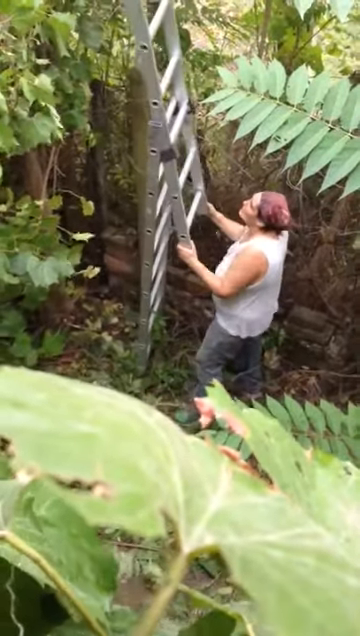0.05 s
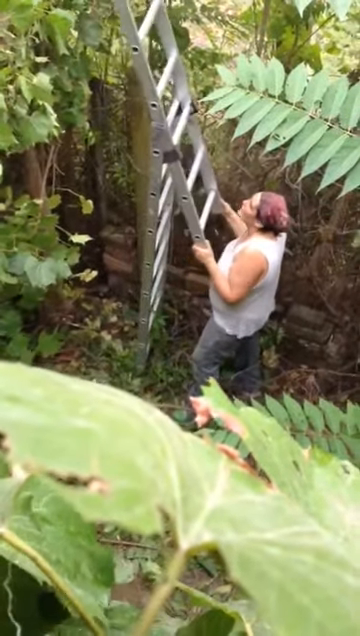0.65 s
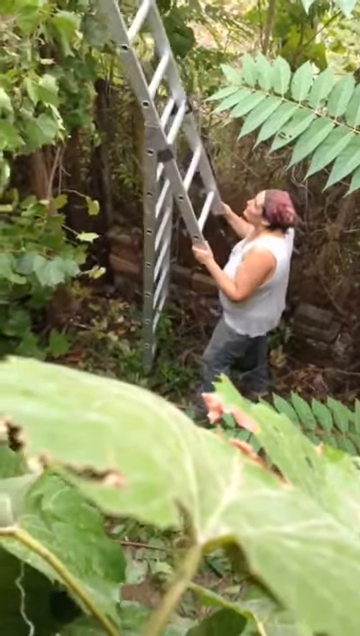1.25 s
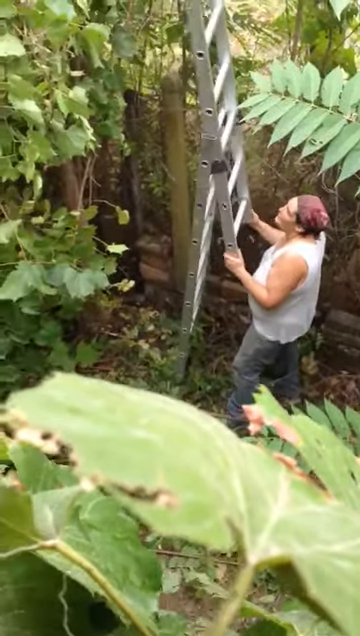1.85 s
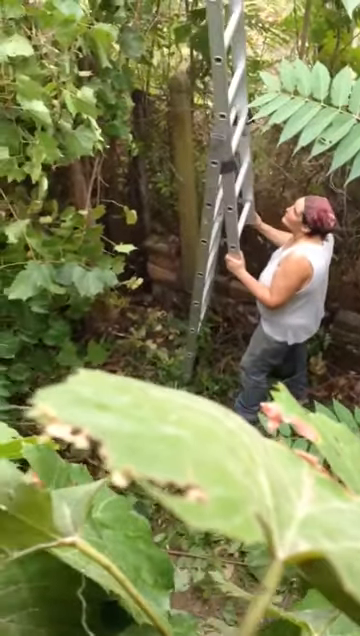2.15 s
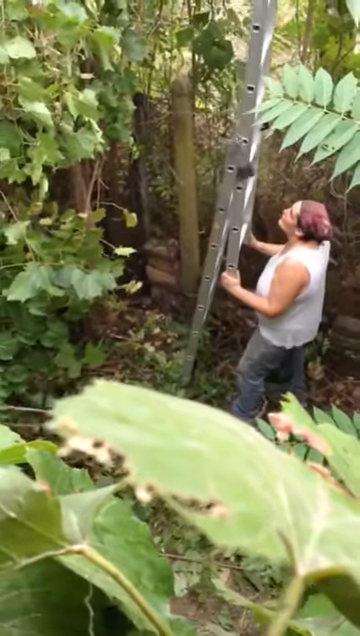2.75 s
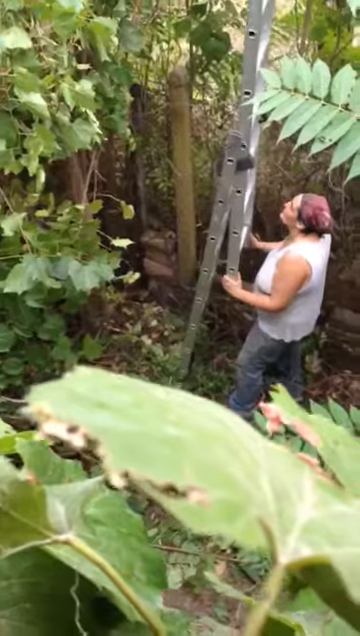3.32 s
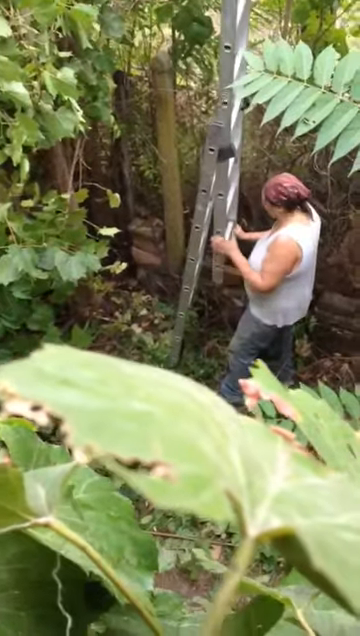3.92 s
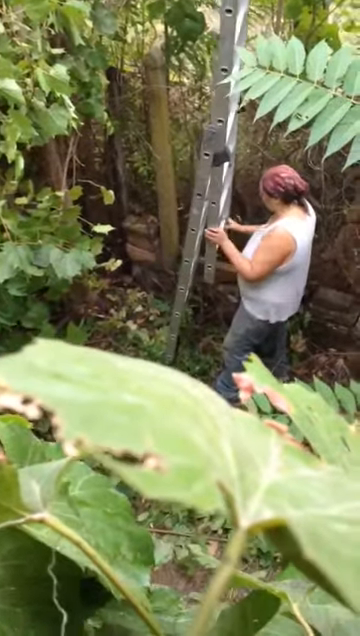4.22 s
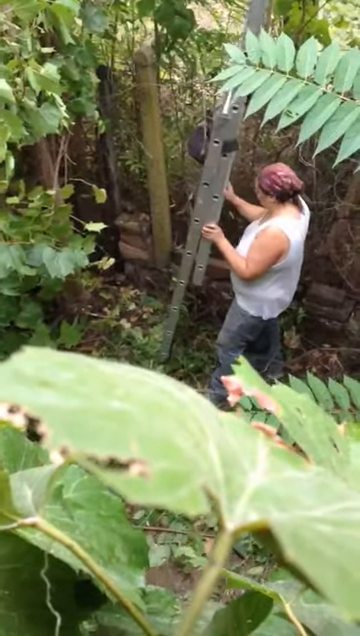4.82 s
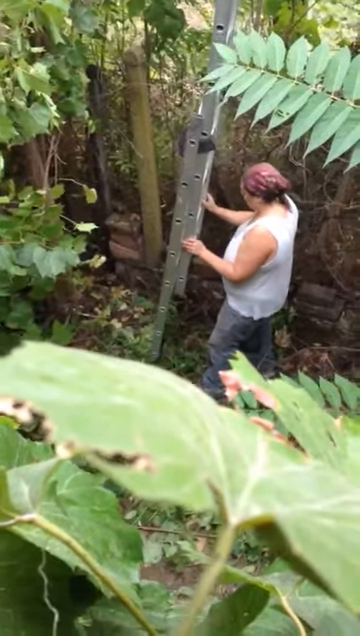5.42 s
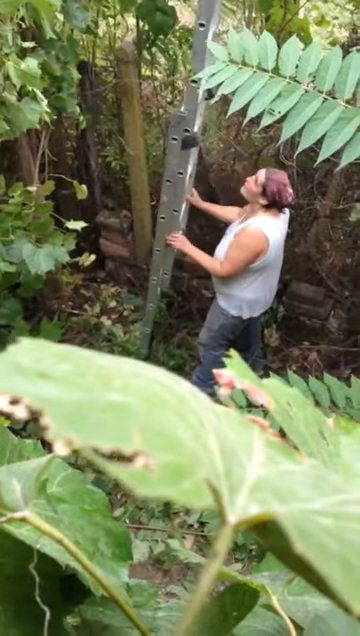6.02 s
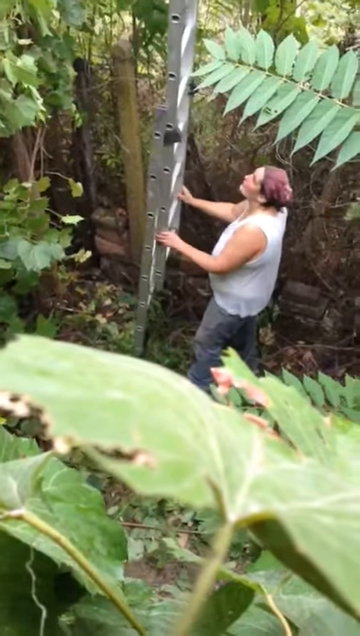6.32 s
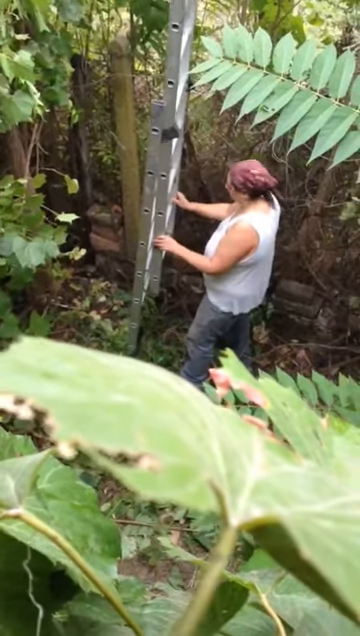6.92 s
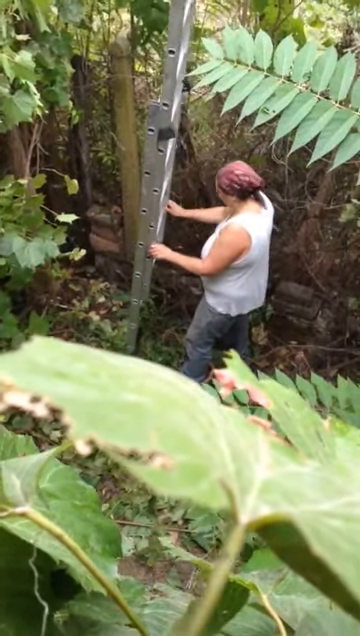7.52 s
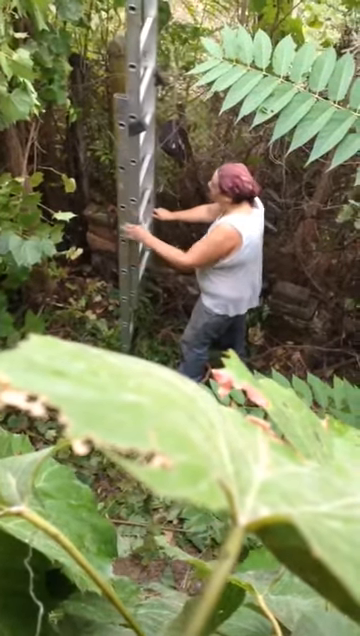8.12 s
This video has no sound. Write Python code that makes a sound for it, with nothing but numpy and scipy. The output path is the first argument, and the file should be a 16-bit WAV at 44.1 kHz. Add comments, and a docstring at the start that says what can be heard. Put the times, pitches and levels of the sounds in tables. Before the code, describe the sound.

Outdoors, over a faint steady hum, a metal ladder knocks and rattles unevenly as it is moved, heard from a few metres off. Bursts of clanking and brief scraping alternate with quieter gaps and soft foliage rustle. A twig cracks partway through, the knocks grow busier, and a tiny squeak leads into a final sharp, bright clatter.

```python
"""An aluminium extension ladder is shifted upright and its sections slid together, a few metres off.
Each knock or stick-slip slide is a flurry of tiny contacts that excites the damped modes of the hollow
rails and rungs; harder contacts ring brighter. Foliage brushes the rails, the rung locks ping, a twig
snaps and a rail squeaks. A garden fence and bushes scatter the sound, over a low outdoor hum."""
import sys
import numpy as np
from scipy import signal
from scipy.fft import rfft, irfft, next_fast_len
from scipy.io import wavfile
from scipy.ndimage import uniform_filter1d

SR = 44100
rng = np.random.default_rng(int(sys.argv[2]) if len(sys.argv) > 2 else 0)


def write(x):
    x = np.atleast_2d(x).T
    wavfile.write(sys.argv[1], SR, np.round(np.clip(x, -1, 1) * 32767).astype(np.int16))


N = 359856
RING_SAMPLES = int(.75 * SR)
CUTOFF_HZ = 11000
ENERGY_WINDOW_S = .03   # a contact's level is its energy expressed as an rms over this time

# sections knocking together: start_s, contact_s, level_db, hardness_db (treble), weight_db (bass)
KNOCKS = [(0.0, 0.00088, -44.5, 3, -5), (0.19, 0.0064, -51.5, -16, 0), (0.565, 0.01, -54, -2.5, 3),
          (0.731, 0.0018, -41, -6, -2.5), (0.856, 0.0025, -53.5, -8, 3), (0.96, 0.017, -47, -6, -10),
          (0.986, .004, -47.5, 0, 0.5), (1.046, 0.00088, -49.5, -3.5, -3), (1.601, 0.0019, -48, 1.5, 1),
          (1.782, 0.004, -35.5, -1.5, 4), (1.955, .003, -34, 8.5, -3), (1.978, 0.0088, -30, 4.5, 1),
          (2.041, 0.0036, -34, 5.5, 0.5), (2.434, .002, -35, 1.5, 0.5), (2.596, 0.0019, -48.5, 12, -6),
          (3.045, 0.009, -55, -6, -5), (3.345, .004, -60.5, -8, -5), (3.51, 0.0061, -35, -2, -2),
          (3.655, 0.0061, -45, 8, 1.5), (3.67, 0.00058, -41.5, 3, 1.5), (3.836, 0.0077, -45, -7, 0.5),
          (3.918, 0.0027, -35, 3.5, -3), (4.51, 0.0051, -43.5, -6.5, 7), (4.571, 0.0048, -51.5, 7, -3),
          (4.618, 0.0054, -35, -6, 0.5), (4.675, 0.009, -36, 2.5, 3.5), (4.702, 0.0021, -29.5, 1, 7),
          (4.779, 0.0065, -38.5, -11, -13), (4.842, 0.0017, -37, -11, -3.5), (4.881, 0.0036, -43, 0.5, 3.5),
          (5.112, 0.0035, -40, -2, 0.5), (5.38, 0.011, -43.5, -5, 0), (5.403, 0.021, -29, 5.5, -1),
          (5.414, 0.0022, -28.5, 13, 2), (5.428, 0.0029, -30, 11, -6), (5.561, 0.004, -32.5, 1, 1.5),
          (6.016, .001, -55.5, -5, -8), (6.139, 0.0037, -51.5, -10.5, 5), (6.194, 0.0059, -37, 6, 2),
          (6.298, 0.0035, -41, -3.5, 3), (6.467, 0.01, -40.5, 0.5, 3), (6.729, 0.0031, -35.5, 7, 2.5),
          (6.757, 0.0022, -32, 4, 0), (7.203, 0.006, -43, -2, 7.5), (7.323, 0.0038, -31, 7, -0.5),
          (7.505, .016, -33, -7.5, 3.5), (7.543, 0.0068, -39, 5, 0), (7.641, 0.0077, -42.5, -6.5, 4),
          (7.849, .012, -24, 12, 4.5), (7.861, 0.0037, -23, 11.5, 4.5), (7.91, 0.01, -26, 4, -2)]
# how strongly the ladder radiates: frequency_hz, density_db
RADIATION = [(90, -32), (140, -32), (220, -12.5), (380, -12.5), (560, -8.5), (780, -14), (1000, -4.5),
             (1180, -3), (1500, -11.5), (2100, -12.5), (4000, -12), (7000, -14), (10000, -16.5),
             (11000, -35)]
# resonances of rails and rungs: centre_hz, width_hz, lift_db
RESONANCES = [(266, 32, 3), (499.5, 33, 7.5), (619, 40, 9.5), (702.6, 29, 15.5), (905, 20, 5),
              (1056, 24, 3), (1096, 44, 4.5), (1180, 60, 2.5), (1353, 20, -2), (1475, 37, 9.5),
              (1607, 43, 3.5), (1910, 108, 5.5), (2220, 31, -1), (2380, 45, 5.5), (2996, 130, 4),
              (3300, 36, 5), (3530, 35, 5), (3910, 140, 4.5), (4250, 120, 7), (4620, 92, 4.5),
              (5400, 70, -9), (6000, 41, -5), (7450, 50, 6), (9700, 70, -3)]
# decay of the ladder held in two hands: frequency_hz, t60_s
HELD_DECAY = [(200, 0.33), (600, 0.19), (1150, 0.26), (2000, 0.28), (4000, 0.21), (10000, 0.21)]
# bending modes that ring on: pitch_hz, level_db, t60_s
BENDING_MODES = [(690, -24, .55), (1045, -17, .55), (1101, -13, 0.81), (1180, -17, .55),
                 (1242, -12.5, 0.46), (1437, -10, 0.47)]
# bounds of the five registers of a contact: edge_hz
REGISTER_EDGES_HZ = [150, 400, 800, 1800, 4500, 10500]
# colour of a contact in each register, low to high: offset_db, hardness_share, weight_share
CONTACT_COLOUR = [(-19.5, 0.0071, 0.43), (-10, 0, 1), (0.83, 0.073, 0), (-6.5, 0.65, 0), (-12, 1, 0.07)]
# foliage against the rails: time_s, level_db
FOLIAGE_LEVELS = [(0.0, -69.5), (1.55, -77), (1.93, -56), (2.2, -71.5), (2.45, -52.5), (2.83, -65.5),
                  (3.02, -59.5), (3.3, -74), (3.55, -60.5), (4.16, -61.5), (4.42, -77), (4.7, -60),
                  (5.5, -64), (5.7, -91), (6.12, -80), (6.4, -62), (6.92, -67), (7.04, -58.5), (8.16, -63)]
# spectral shape of the brushing leaves: frequency_hz, density_db
LEAF_SPECTRUM = [(300, -22), (1200, 14.5), (3000, 8), (9000, 9), (11000, 0.5), (13000, -40)]
# spectral shape of the outdoor hum: frequency_hz, density_db
HUM_SPECTRUM = [(25, -49), (60, -48), (90, -10.5), (125, -1), (220, 2), (400, -3.5), (700, -12),
                (1200, -10), (2500, -23), (5000, -25.5), (10000, -33.5)]
# rung locks ringing: start_s, pitch_hz, level_db, t60_s
LOCK_PINGS = [(1.603, 3260, -42.5, 0.13), (2.438, 3170, -35, 0.15), (3.92, 3000, -26.5, 0.081)]
# one section sliding along the other: start_s, length_s, level_db, hardness_db, weight_db
SLIDES = [(1.665, 0.097, -46, -3.5, 5.5), (1.883, .07, -42.5, 1.5, -3), (2.339, .085, -44.5, 4, -1),
          (2.53, 0.21, -48, -7, -3), (3.149, 0.056, -64, -1.5, -3), (3.998, 0.13, -54, -5.5, 6.5),
          (4.242, 0.048, -51.5, -4.5, 1.5), (4.943, 0.13, -45.5, -12.5, 0), (5.229, .13, -54, -16, -5.5),
          (6.249, 0.209, -50, 0, -1.5), (7.007, .13, -51.5, -7, 6), (7.26, .06, -38.5, -8, -1.5),
          (7.569, 0.045, -42, -12, 0.5), (7.73, 0.14, -47, 1, 5)]
# spectral shape of a dry twig underfoot: frequency_hz, density_db
TWIG_SPECTRUM = [(100, -35), (250, 3), (500, 4), (900, -1), (1800, -1), (3500, -11.5), (10000, -14)]
# first three harmonics of the squeak: level_db
SQUEAK_HARMONICS_DB = [-46, -48.5, -56]


def from_db(db):
    """Amplitude grows tenfold for every 20 dB."""
    return 10 ** (np.asarray(db) / 20)


def at_hz(points, hz):
    """Interpolation on a logarithmic frequency axis."""
    known_hz, values = np.transpose(points)
    return np.interp(np.log(np.maximum(hz, 1)), np.log(known_hz), values)


def coloured(x, spectrum):
    """Filtering multiplies a sound's spectrum by a gain curve; the result has unit rms."""
    gain = from_db(at_hz(spectrum, np.fft.rfftfreq(N, 1 / SR)))
    shaped = irfft(rfft(x) * gain, N)
    return shaped / np.sqrt(np.mean(shaped ** 2) + 1e-20)


def add(out, start_s, sound):
    """Superposition: a sound adds linearly to those already present."""
    start = max(0, round(start_s * SR))
    out[start:start + len(sound)] += sound[:N - start]


def ringing(hz, t60_s):
    """Free vibration: each mode (one a row) is an exponentially damped sine of random phase."""
    t = np.arange(RING_SAMPLES, dtype=np.float32) / SR
    phase = rng.uniform(0, 2 * np.pi, len(hz))
    omega, decay, phase = np.float32([2 * np.pi * hz, np.log(1000) / t60_s, phase])[:, :, None]
    return np.sin(omega * t + phase) * np.exp(-decay * t)


def ladder_modes(count=620, damping_spread=0.095):
    """A thin-walled frame has hundreds of normal modes, strongest near rail and rung resonances."""
    rank = (np.arange(count) + rng.random(count)) / count
    hz = 100 + (CUTOFF_HZ - 100) * rank ** 1.6
    lift_db = sum(db / (1 + (2 * (hz - centre) / width) ** 2) for centre, width, db in RESONANCES)
    spacing_hz = np.gradient(hz)
    strength = from_db(at_hz(RADIATION, hz) + lift_db) * np.sqrt(spacing_hz / 10)
    t60_s = at_hz(HELD_DECAY, hz) * np.exp(damping_spread * rng.standard_normal(count))
    bending_hz, bending_db, bending_t60_s = np.transpose(BENDING_MODES)
    amplitudes = np.float32(np.r_[strength, from_db(bending_db)])
    return ringing(np.r_[hz, bending_hz], np.r_[t60_s, bending_t60_s]) * amplitudes[:, None]


def chatter(contact_s, per_s=900, uneven_db=5.5, first_touch=0.9):
    """Loose metal exerts a random impulse train that swells for the contact time, then dies away."""
    age = np.arange(RING_SAMPLES // 3) / SR / contact_s
    impulses = rng.choice([-1, 1], len(age)) * from_db(uneven_db * rng.standard_normal(len(age)))
    touching = rng.random(len(age)) < per_s / SR
    force = impulses * touching * np.sqrt(age * np.exp(1 - age))
    force[0] += first_touch
    return force


def voiced(blow, levels_db):
    """Where and how hard the metal meets sets the distribution of energy among the registers."""
    size = next_fast_len(len(blow))
    spectrum, hz = rfft(blow, size), np.fft.rfftfreq(size, 1 / SR)
    registers = list(zip(REGISTER_EDGES_HZ, REGISTER_EDGES_HZ[1:]))
    centres_hz = np.sqrt(np.prod(registers, axis=1))
    for _ in range(2):   # two passes, as the gains of neighbouring registers overlap
        energy = np.array([np.sum(abs(spectrum[(hz >= low) & (hz < high)]) ** 2)
                           for low, high in registers])
        power_db = 10 * np.log10(2 * energy / (size * ENERGY_WINDOW_S * SR))
        spectrum = spectrum * from_db(at_hz(np.c_[centres_hz, levels_db - power_db], hz))
    return irfft(spectrum, size)[:RING_SAMPLES]


def ladder(mode_spread_db=2.5, group_spread_db=1.43, group_size=10, low_cut_hz=125):
    """Modal excitation: each knock or slip lands elsewhere, favouring other modes and mode groups."""
    modes, out = ladder_modes(), np.zeros(N)
    contacts = KNOCKS + slips()
    shape = (len(contacts), len(modes))
    groups = uniform_filter1d(rng.standard_normal(shape), group_size) * np.sqrt(group_size)
    signs = rng.choice([-1, 1], shape)
    coupling = signs * from_db(mode_spread_db * rng.standard_normal(shape) + group_spread_db * groups)
    responses = np.float32(coupling) @ modes
    offset_db, hardness_share, weight_share = np.transpose(CONTACT_COLOUR)
    for (start_s, contact_s, level_db, hardness_db, weight_db), response in zip(contacts, responses):
        blow = signal.fftconvolve(response, chatter(contact_s))[:RING_SAMPLES]
        levels_db = level_db + offset_db + hardness_db * hardness_share + weight_db * weight_share
        add(out, start_s, voiced(blow, levels_db))
    # the ladder's deepest bass is cut away
    return signal.sosfilt(signal.butter(3, low_cut_hz, "high", fs=SR, output="sos"), out)


def foliage(gain_db=-0.5, ticks_per_s=9000, patchy_db=1.5, patch_count=130):
    """Shot noise: leaves and twigs tick densely along the moving rails, in uneven patches."""
    ticks = (rng.random(N) < ticks_per_s / SR) * rng.standard_normal(N)
    patches = np.interp(np.arange(N), np.linspace(0, N, patch_count), rng.standard_normal(patch_count))
    level_db = np.interp(np.arange(N) / SR, *np.transpose(FOLIAGE_LEVELS))
    return coloured(ticks, LEAF_SPECTRUM) * from_db(gain_db + patchy_db * patches + level_db)


def outdoor_hum(level_db=-61):
    """Stationary noise with its power at low frequencies is heard as a steady hum."""
    return from_db(level_db) * coloured(rng.standard_normal(N), HUM_SPECTRUM)


def rung_locks(count=5, spread=0.027, attack_s=.001):
    """A lock rings with a tight cluster of modes, which beat as they decay."""
    out = np.zeros(N)
    attack = np.minimum(np.arange(RING_SAMPLES) / (attack_s * SR), 1)
    for start_s, pitch_hz, level_db, t60_s in LOCK_PINGS:
        modes_hz = pitch_hz * (1 + spread * rng.uniform(-0.98, 1, count))
        cluster = ringing(modes_hz, np.full(count, t60_s)).sum(axis=0) / np.sqrt(count)
        add(out, start_s, from_db(level_db) * attack * cluster)
    return out


def slips(per_s=19, first_contact_s=0.019, later_contact_s=.009, jitter=.25, uneven_db=2.5):
    """Stick-slip friction divides a slide's energy among soft, unevenly spaced knocks."""
    rows = []
    for start_s, length_s, level_db, hardness_db, weight_db in SLIDES:
        count = max(1, round(length_s * per_s))
        step_s = length_s / count
        slip_db = level_db + 10 * np.log10(step_s / ENERGY_WINDOW_S)
        for k, (lag, strength) in enumerate(rng.uniform(-1, 1, (count, 2))):
            onset_s = start_s + step_s * (k + jitter * lag) if k else start_s
            contact_s = later_contact_s if k else first_contact_s
            rows.append((onset_s, contact_s, slip_db + uneven_db * strength, hardness_db, weight_db))
    return rows


def twig(start_s=2.981, level_db=-38, t60_s=0.12, low_cut_hz=170):
    """Brittle fracture releases one fast-decaying burst of noise, with no ring."""
    age_s = np.arange(N) / SR - start_s
    envelope = (age_s > 0) * from_db(level_db - 60 * np.clip(age_s / t60_s, 0, 2))
    crack = coloured(rng.standard_normal(N), TWIG_SPECTRUM) * envelope
    return signal.sosfilt(signal.butter(3, low_cut_hz, "high", fs=SR, output="sos"), crack)


def rail_squeak(start_s=7.405, length_s=.095, pitch_hz=1430, sag_hz_per_s=790, waver=0.054, knots=110):
    """Friction drives a binding rail into a brief harmonic oscillation whose pitch wavers and sags."""
    out, t = np.zeros(N), np.arange(int(length_s * SR)) / SR
    wobble = np.interp(t, np.linspace(0, length_s, knots), rng.standard_normal(knots))
    hz = (pitch_hz - sag_hz_per_s * t) * (1 + waver * wobble)
    phase = 2 * np.pi * np.cumsum(hz) / SR
    tone = sum(from_db(db) * np.sin(k * phase) for k, db in enumerate(SQUEAK_HARMONICS_DB, 1))
    add(out, start_s, np.sin(np.pi * t / length_s) * tone)
    return out


def garden(direct, wet_db=-20.0, t60_s=0.7, dull_hz=3000, delay_s=0.029):
    """Diffuse scattering from fence and bushes adds a faint, dull tail to the direct sound."""
    t = np.arange(RING_SAMPLES) / SR
    scatter = rng.standard_normal(RING_SAMPLES) * from_db(-60 * t / t60_s) * (t > delay_s)
    scatter /= np.linalg.norm(scatter)
    scatter = signal.sosfilt(signal.butter(1, dull_hz, fs=SR, output="sos"), scatter)
    return direct + from_db(wet_db) * signal.fftconvolve(direct, scatter)[:N]


def scene():
    """Ladder and twig, with their scatter, superpose on the foliage and the hum in one channel."""
    hum = outdoor_hum()
    direct = ladder() + rung_locks() + rail_squeak() + twig()
    return (garden(direct) + foliage() + hum)[None]


def record(dry):
    """Band limiting: an elliptic low-pass filter cuts the top treble steeply."""
    return signal.sosfilt(signal.ellip(12, .2, 80, CUTOFF_HZ - 200, fs=SR, output="sos"), dry)


dry = scene()
out = record(dry)
write(out)
```